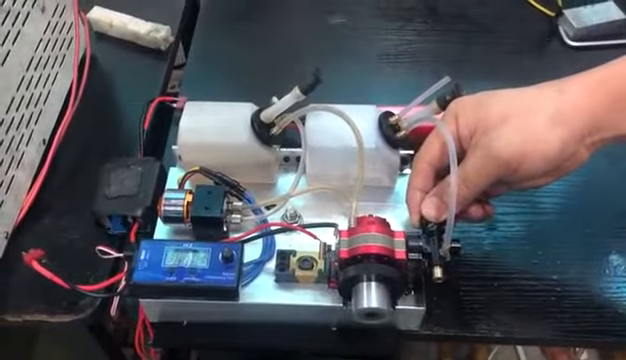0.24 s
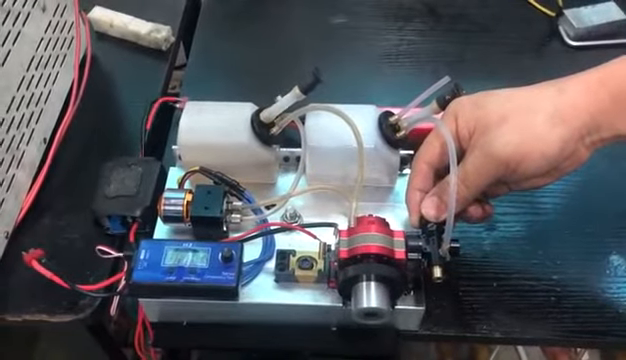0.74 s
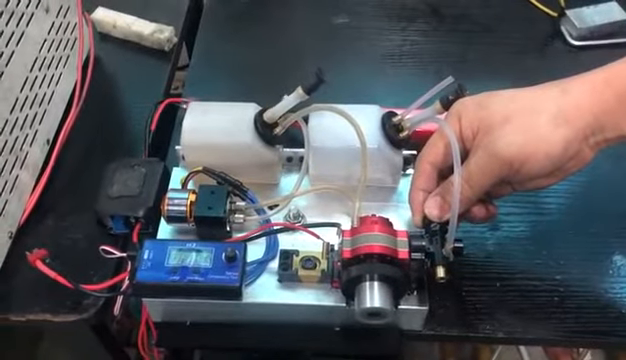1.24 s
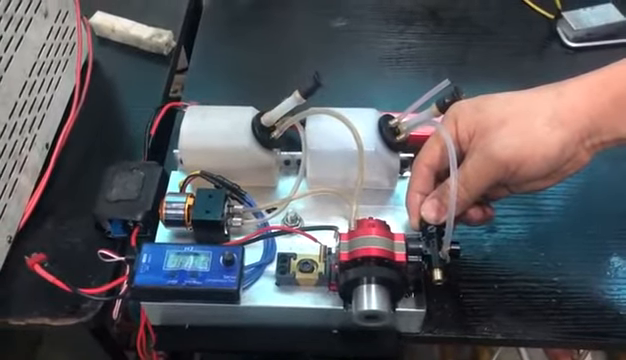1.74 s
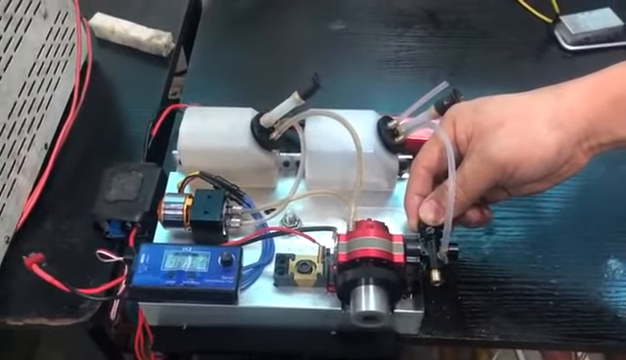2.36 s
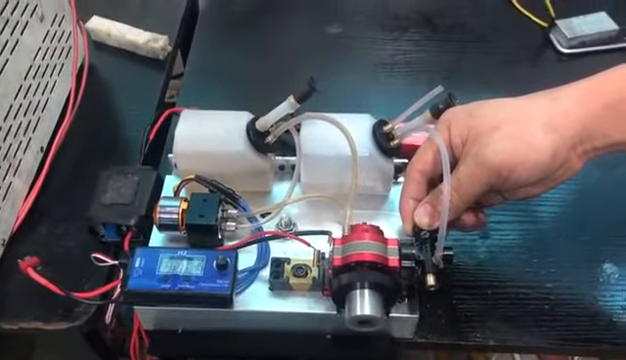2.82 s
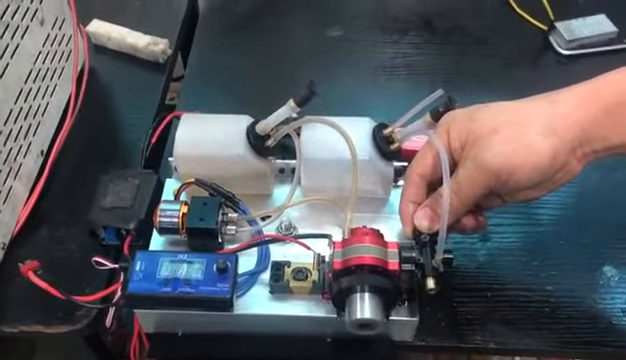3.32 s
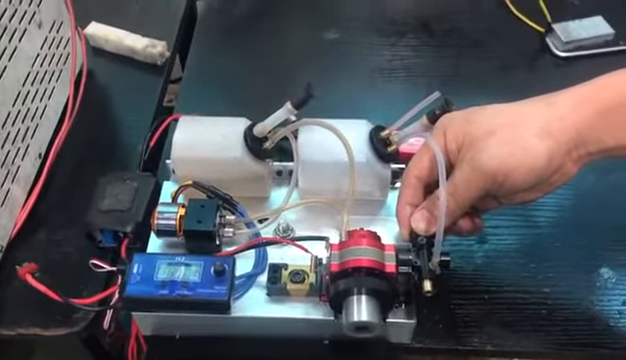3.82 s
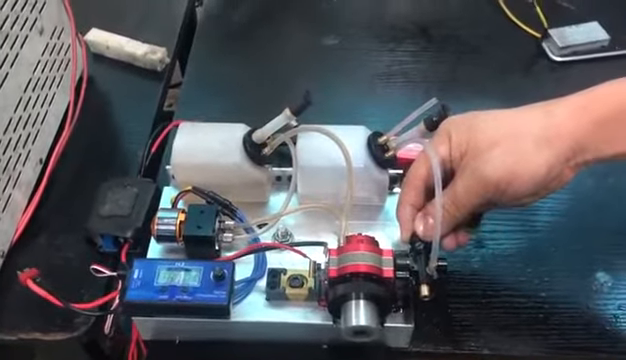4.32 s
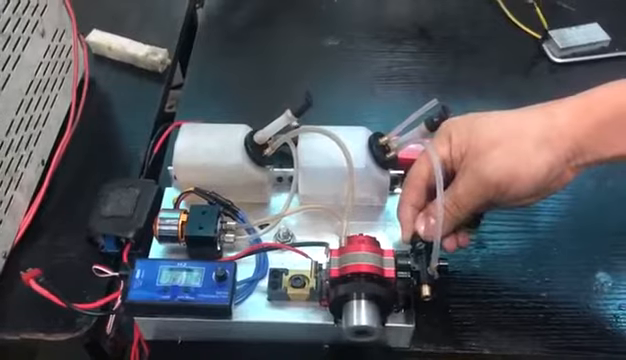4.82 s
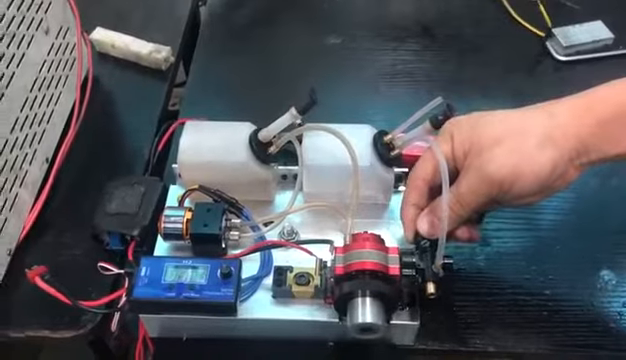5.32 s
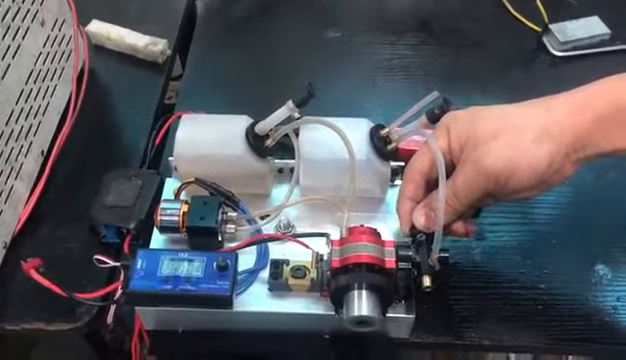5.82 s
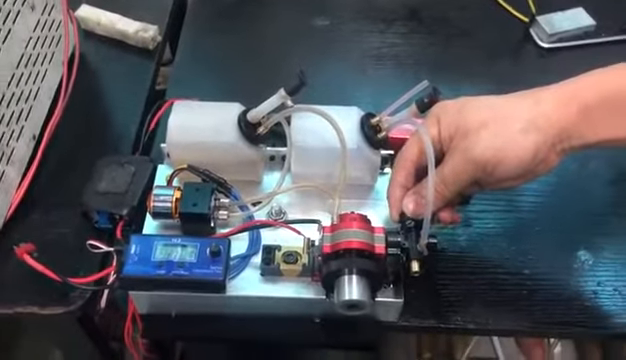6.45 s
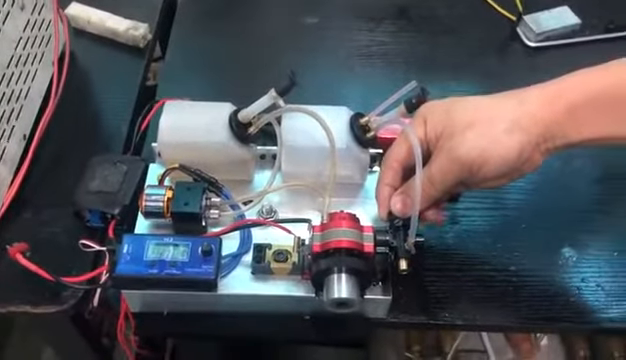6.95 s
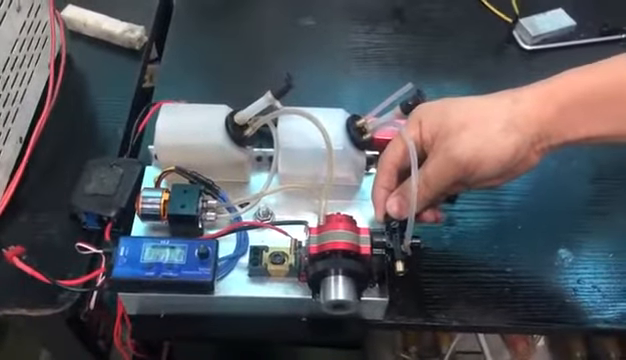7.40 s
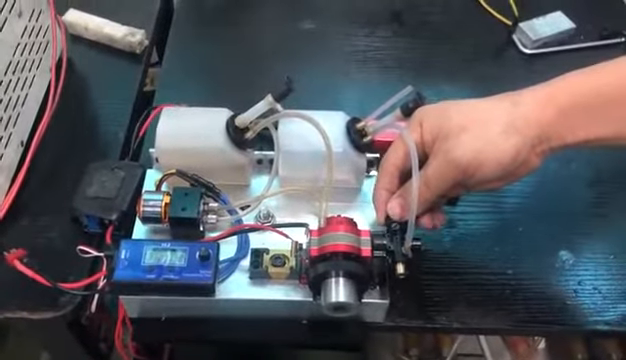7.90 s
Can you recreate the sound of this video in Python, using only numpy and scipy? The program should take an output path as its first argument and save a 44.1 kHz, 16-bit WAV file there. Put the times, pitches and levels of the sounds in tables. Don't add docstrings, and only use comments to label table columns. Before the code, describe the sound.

A small model rotary engine screams at a steady high pitch on a workshop bench, then eases back, sputters and is blipped repeatedly.

```python
import sys
import numpy as np
from scipy import signal
from scipy.fft import rfft, irfft, next_fast_len
from scipy.io import wavfile
from scipy.ndimage import uniform_filter1d, map_coordinates

SR = 44100
rng = np.random.default_rng(int(sys.argv[2]) if len(sys.argv) > 2 else 0)


def ratio(d):
    e = np.asarray(d, float) / 20
    return 10 ** e


def dump_mix(stems):
    frames = np.atleast_2d(stems).T
    limited = np.clip(frames, -1, 1)
    pcm = np.round(limited * 32767).astype(np.int16)
    wavfile.write(sys.argv[1], SR, pcm)


N = 360283


def unit(x):
    return x / np.sqrt(np.mean(x ** 2) + 1e-20)


def along(points, hz):
    point_hz, value = np.transpose(points)
    return np.interp(np.log(hz + 1), np.log(point_hz + 1), value)


def wobble(rate_hz):
    knots = rng.standard_normal(int(N * rate_hz / SR) + 4)
    return map_coordinates(knots, [np.arange(N) * rate_hz / SR])


def coloured(x, gain):
    m = 2 * next_fast_len(N // 2 + 4096)
    cepstrum = irfft(np.log(gain(np.fft.rfftfreq(m, 1 / SR)) + 1e-6), m)
    cepstrum[1:m // 2] *= 2
    cepstrum[m // 2 + 1:] = 0
    return irfft(rfft(x, m) * np.exp(rfft(cepstrum)), m)[:N]


def pulses(at, size):
    taps = np.floor(at)[:, None] + np.arange(-7, 9)
    offset = taps - at[:, None]
    shape = np.sinc(offset) * np.cos(np.pi * offset / 16) ** 2
    index = np.clip(taps, 0, N).astype(int)
    return np.bincount(index.ravel(), (size[:, None] * shape).ravel(), N + 1)[:N]


def scattered(x, radians, step_hz):
    m = next_fast_len(N + 4096)
    knots = np.fft.rfftfreq(m, 1 / SR) / step_hz
    phase = radians * map_coordinates(rng.standard_normal(400), [knots])
    return irfft(rfft(x, m) * np.exp(1j * phase), m)[:N]


def patchy(depth_db):
    z = signal.stft(rng.standard_normal(N), nperseg=512)[2]
    field = uniform_filter1d(rng.standard_normal(z.shape), size=4, axis=0)
    field = uniform_filter1d(field, size=8, axis=1)
    return signal.istft(z * ratio(depth_db * unit(field)), nperseg=512)[1][:N]


def bend(u, ease, lean):
    w = u ** lean
    return w + ease * (w * w * (3 - 2 * w) - w)


# start_s, shaft_hz
HELD_SPEED = [(0.0, 375.7), (0.182, 385.5), (0.39, 377.3), (0.62, 385), (0.88, 386.9), (1.2, 379.2),
              (1.31, 391.2), (1.41, 376.8), (1.83, 386.5), (2.33, 390.9), (2.42, 399), (2.48, 377.2),
              (2.76, 395), (2.89, 381.4), (3.02, 388.7), (3.78, 398.2), (3.85, 398), (3.951, 406.4)]
# start_s, shaft_hz, firing_db
EASED_BACK = [(4.11, 370.8, -18), (4.19, 366.4, -16.5), (4.42, 324.4, -23), (4.49, 322.5, -18),
              (4.64, 315.5, -19.5), (4.7, 301, -18.5), (4.77, 307.9, -18), (4.82, 297, -17.5),
              (4.889, 310, -17.5)]
# open_s, low_hz, flame_out_s, top_hz, overrun_db
THROTTLE_BLIPS = [(4.965, 302, 5.374, 386.5, -9), (5.616, 315.5, 6.009, 395, -9),
                  (6.218, 324.5, 6.614, 394, -8.5), (6.889, 311.5, 7.199, 373.5, -8),
                  (7.408, 321, 7.615, 357.5, -5), (7.721, 336, 7.926, 371, -5.5),
                  (8.032, 348.5, 8.25, 364, -6)]
PEAK_LEAD_S = .021
RISE_EASE, RISE_LEAN, FALL_EASE, FALL_LEAN = .3, 0.96, .55, .88
OPEN_DB, CATCH_DB, CATCH_S, SHUT_DB = -13.5, -2.5, 0.074, -17
HISS_DB, HISS_SHUT_DB, HISS_CATCH_DB = -9.5, -1, 0


def throttle():
    t = np.arange(N) / SR
    hold_end_s = HELD_SPEED[-1][0]
    speed_points = HELD_SPEED + [row[:2] for row in EASED_BACK] + [THROTTLE_BLIPS[0][:2]]
    load_points = [(hold_end_s, OPEN_DB)] + [row[::2] for row in EASED_BACK]
    speed_hz = np.interp(t, *np.transpose(speed_points))
    load_db = np.interp(t, *np.transpose(load_points))
    hiss_db = HISS_DB + HISS_SHUT_DB * (t > hold_end_s)
    following = THROTTLE_BLIPS[1:] + [(9, 300)]
    for (open_s, low_hz, out_s, top_hz, _), (next_s, rest_hz, *_) in zip(THROTTLE_BLIPS, following):
        peak_s, on = out_s - PEAK_LEAD_S, t >= open_s
        rise = bend(np.clip((t[on] - open_s) / (peak_s - open_s), 0, 1), RISE_EASE, RISE_LEAN)
        fall = bend(np.clip((t[on] - peak_s) / (next_s - peak_s), 0, 1), FALL_EASE, FALL_LEAN)
        speed_hz[on] = low_hz + (top_hz - low_hz) * rise + (rest_hz - top_hz) * fall
        catch, lit = np.exp(-(t[on] - open_s) / CATCH_S), t[on] < out_s
        load_db[on] = np.where(lit, OPEN_DB + CATCH_DB * catch, SHUT_DB)
        hiss_db[on] = HISS_DB + np.where(lit, HISS_CATCH_DB * catch, HISS_SHUT_DB)
    return speed_hz, uniform_filter1d(load_db, size=700), uniform_filter1d(hiss_db, size=700)


def shaft(speed_hz):
    return np.cumsum(uniform_filter1d(speed_hz, size=900) * (1 + .002 * wobble(25))) / SR


# start_s, length_s, strength_db
STRAY_FIRINGS = [(5.385, .007, -1), (5.421, 0.00399, -0.5), (5.536, 0.0074, 1), (5.546, 0.007, 0.5),
                 (6.135, .018, -1.5), (6.772, 0.029, -2), (6.82, .007, 1), (6.835, 0.009, 0),
                 (7.282, .012, 1.5), (7.334, 0.00496, 1), (7.373, .02, 2), (7.652, 0.01025, 1),
                 (7.685, .021, 1), (7.959, .007, -2), (7.969, .008, 1.5), (7.987, 0.016, 0.5),
                 (8.011, 0.011, 1.5)]
# start_s, length_s, depth_db
FLAME_GAPS = [(2.435, 0.03, -6), (4.003, 0.019, -8), (4.068, 0.023, -4.5), (4.189, 0.0091, -12),
              (4.209, 0.023, -7), (4.242, .012, -7), (4.267, 0.015, -4.5), (4.292, 0.029, -13),
              (4.335, .015, -10), (4.404, 0.023, -4), (4.527, .023, -6.5), (4.58, .013, -9),
              (4.649, .048, -10), (4.777, 0.026, -6.5), (4.806, .011, -4.5), (4.902, .024, -5),
              (4.608, 0.0067, -3.5), (8.106, .012, -4.5)]
# start_s, depth_db
MISFIRES = [(0.285, -9), (0.333, -7), (.347, -2), (0.364, -19), (.387, 0), (.417, -14), (.671, -11),
            (.699, -6), (.904, -2.5), (.922, -11), (1.009, -5), (1.146, -7), (1.177, -11), (1.331, -11),
            (1.343, -7), (1.396, -15), (2.856, -12), (3.026, -13), (3.302, -1), (3.368, -11), (3.824, -8),
            (3.841, -5), (4.048, -4), (4.102, -14), (4.711, -4), (5.377, -2), (7.602, -4), (7.612, -4)]
MISFIRE_S, WEAK_DB, WEAK_S = 0.00575, -6, 0.0054
FADE_S, FADE_FROM = .05, 0.76


def burning():
    db, t = np.zeros(N), np.arange(N) / SR
    for (*_, out_s, _, depth_db), (next_s, *_) in zip(THROTTLE_BLIPS, THROTTLE_BLIPS[1:]):
        off = (t > out_s) & (t < next_s)
        db[off] = depth_db * (1 - (1 - FADE_FROM) * np.exp(-(t[off] - out_s) / FADE_S))
    for start_s, length_s, strength_db in STRAY_FIRINGS:
        db[round(start_s * SR):round((start_s + length_s) * SR)] = strength_db
    weak = [(s * HELD_SPEED[-1][0], WEAK_S * (.5 + u), WEAK_DB * (.5 + v))
            for s, u, v in rng.random(size=(28, 3))]
    clear = [(start_s, MISFIRE_S, depth_db) for start_s, depth_db in MISFIRES]
    for start_s, length_s, depth_db in weak + clear + FLAME_GAPS:
        first = max(round((start_s - .001) * SR), 0)
        db[first:round((start_s + length_s + .0005) * SR)] = depth_db
    return uniform_filter1d(1.64 * db, size=45)


ROTOR_FACES = [0.76, -0.28, -0.77]
FACES_EVEN_HZ, FACES_GROW = 385, 1.1


def exhaust_pulses(turns, speed_hz, burn_db):
    turn = np.arange(1, int(turns[-1]))
    at = np.interp(turn, turns, np.arange(N))
    index = at.astype(int)
    chance = rng.standard_normal((len(turn), 2))
    face_db = np.take(ROTOR_FACES, turn % 3)
    uneven = 1 + .22 * np.abs(uniform_filter1d(burn_db, size=2000))
    contrast = 1 + FACES_GROW * (FACES_EVEN_HZ - speed_hz[index]).clip(0) / 70
    size_db = face_db * contrast + 0.45 * uneven[index] * chance[:, 0]
    size_db[1:] += 0.06 * np.clip(np.diff(burn_db[index]), 0, None)
    size_db += (burn_db + 0.6 * wobble(30))[index]
    return pulses(at + 1.0 * face_db + 0.33 * chance[:, 1], ratio(size_db))


# centre_hz, width_hz, depth_db
BENCH_NOTCHES = [(651, 100, -5.5), (963.9, 42, -6.5), (1046, 62, -10), (1111, 30, -4.5), (1257, 109, -7.5),
                 (1441, 44, -11.5), (1525, 55, -14.5), (1764, 88, -6), (2070, 150, -14), (2362, 60, -6.5),
                 (3010, 330, -13.5), (3466, 66, -9), (3632, 67, -8.5), (4020, 220, -9)]


def bench(hz):
    return ratio(sum(db / (1 + (2 * (hz - c) / w) ** 2) for c, w, db in BENCH_NOTCHES))


# freq_hz, level_db
PIPE_COLOUR = [(150, -71), (420, -40.5), (600, -12), (800, -14), (1150, -7.5), (1600, -6.5), (1900, -12),
               (2200, -21.5), (2600, -17.5), (3300, -15.5), (3900, -22), (4400, -35), (6000, -30.5),
               (9000, -50)]


def exhaust_note(blows):
    smeared = scattered(blows, radians=1.44, step_hz=294.7)
    return unit(coloured(smeared, lambda hz: ratio(along(PIPE_COLOUR, hz)) * bench(hz)))


# freq_hz, density_db_per_hz
GAS_COLOUR = [(100, -29), (300, -17.5), (700, -4), (1400, -16.5), (2000, -3.5), (3300, 2), (4300, -10),
              (5200, -8), (7000, -4), (8800, -7.5), (10000, -5.5), (11500, -0.5), (12800, -5),
              (14300, -12.5)]
SPIT, SPIT_S = 1.3, .0004


def exhaust_hiss(blows):
    puff = signal.lfilter([1], [1, -np.exp(-1 / (0.005 * SR))], np.abs(blows))
    puff = puff + SPIT * signal.lfilter([1], [1, -np.exp(-1 / (SPIT_S * SR))], np.abs(blows))
    rush = unit(puff) * patchy(depth_db=2.5)
    return unit(coloured(rush, lambda hz: ratio(along(GAS_COLOUR, hz)) * bench(hz) ** 0.69))


# freq_hz, density_db_per_hz
GEAR_COLOUR = [(40, -17.5), (150, -8), (450, -9.5), (800, -5.5), (1400, -4.5), (2050, -9), (2700, -9.5),
               (4000, -8), (5500, -18), (7000, -16), (8600, -26), (11500, -27.5), (14300, -18.5)]


def gear_rattle(turns, speed_hz):
    beat = 1 + 0.55 * np.cos(2 * np.pi * turns)
    gear = unit(coloured(beat * patchy(depth_db=3.5), lambda hz: ratio(along(GEAR_COLOUR, hz))))
    return ratio(-27.5 + 1.8 * wobble(17)) * (speed_hz / 350) ** 1.3 * gear


# shaft_hz, level_db
PUMPING_LEVEL = [(300, -42), (324, -29.5), (343, -32), (355, -30.5), (369, -26), (380, -37), (400, -50)]


def pumping_hum(turns, speed_hz):
    level_db = along(PUMPING_LEVEL, speed_hz) + 1.5 * wobble(9) + 2.5 + 1.5 * wobble(25)
    return ratio(level_db) * np.sin(2 * np.pi * turns)


def engine():
    speed_hz, load_db, hiss_db = throttle()
    turns = shaft(speed_hz)
    blows = exhaust_pulses(turns, speed_hz, burning())
    note = ratio(load_db - 2.5) * exhaust_note(blows)
    hiss = ratio(load_db + hiss_db - 0.5 + 0.32 * wobble(11)) * exhaust_hiss(blows)
    return note + hiss + gear_rattle(turns, speed_hz) + pumping_hum(turns, speed_hz)


# freq_hz, t60_s
SHOP_DECAY = [(300, 0.32), (2000, 0.39), (10000, 0.029)]


def shop(x):
    hz, t, z = signal.stft(rng.standard_normal(SR // 2), SR, nperseg=256)
    decay = ratio(-60 * t / along(SHOP_DECAY, hz)[:, None])
    tail = signal.istft(z * decay, SR, nperseg=256)[1]
    return signal.fftconvolve(np.pad(x, (300, 0)), tail / np.linalg.norm(tail))[:N]


def scene():
    near = engine()
    return (near + ratio(-15.5) * shop(near))[None]


# freq_hz, threshold_db
MASKED_BANDS = [(60, -19.5), (200, -16.5), (330, -23.5), (1500, -12), (2100, -13), (3500, -17),
                (4500, -5.5), (8500, -3.5), (11000, -9.5), (13300, -1)]


def thinned(x):
    hz, _, z = signal.stft(x, SR, nperseg=2048)
    power = np.abs(z) ** 2
    band = np.add.reduceat(power, np.arange(0, len(hz), 6)) / 6
    band = np.repeat(band, 6, axis=0)[:len(hz)]
    around = uniform_filter1d(power, size=90, axis=0)
    keep = band > around * ratio(2 * along(MASKED_BANDS, hz))[:, None]
    return signal.istft(z * keep, SR, nperseg=2048)[1][:N]


def roll_off(x):
    return signal.sosfilt(signal.butter(12, 14420, fs=SR, output="sos"), x)


def record(dry):
    phone = dry[0] / (1 + np.abs(dry[0] / 0.45) ** 4) ** 0.28
    phone = coloured(phone, lambda hz: (hz < 14130) / np.sqrt(1 + (290 / (hz + 1)) ** 4))
    return roll_off(thinned(phone)[None])


dry = scene()
out = record(dry)
dump_mix(out)
```